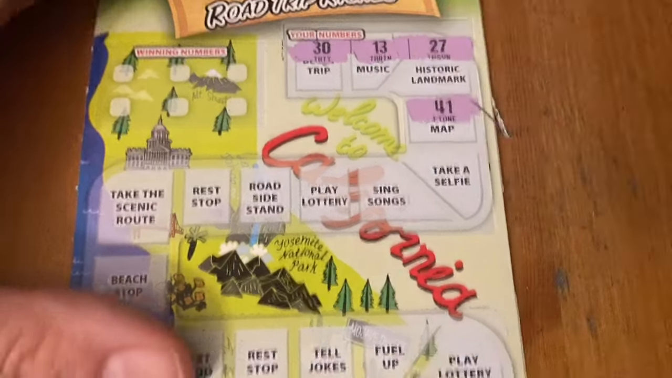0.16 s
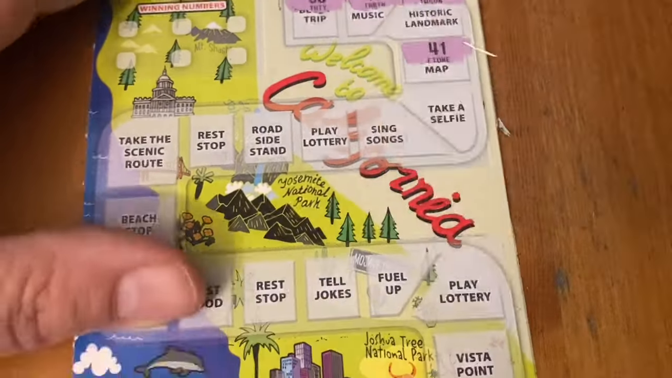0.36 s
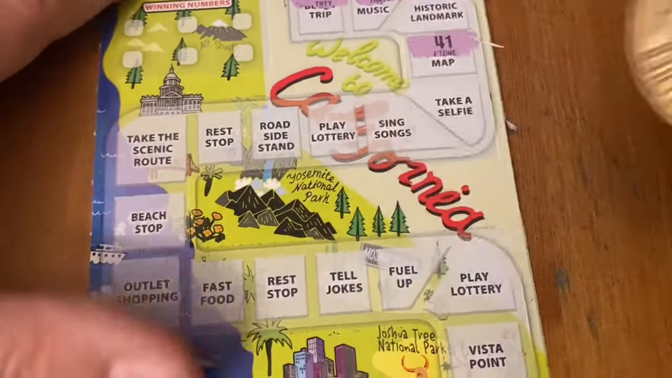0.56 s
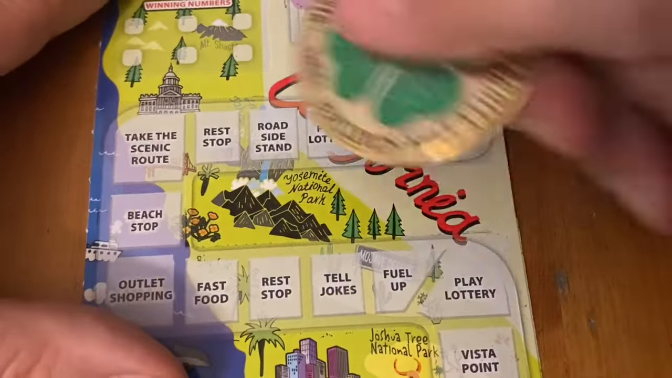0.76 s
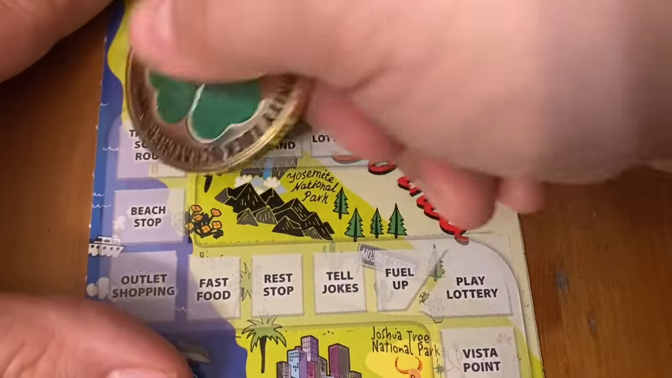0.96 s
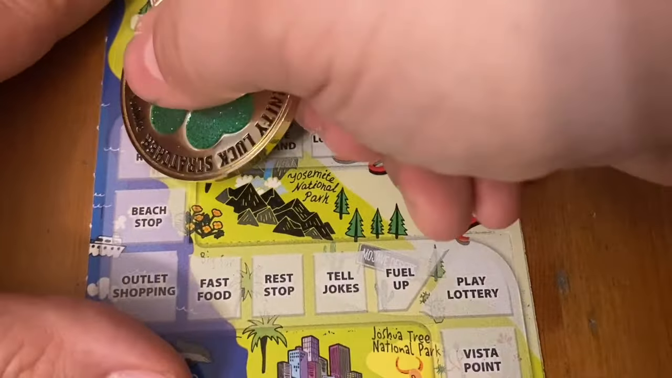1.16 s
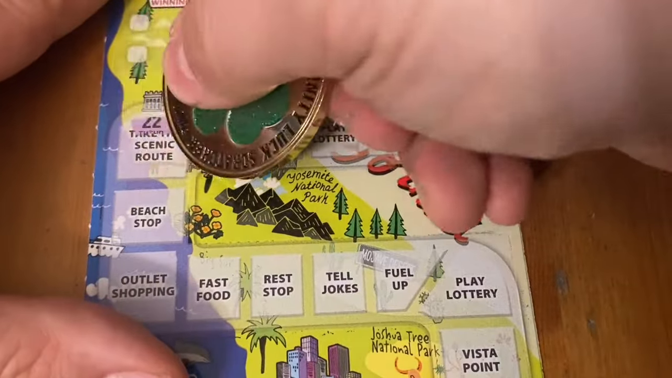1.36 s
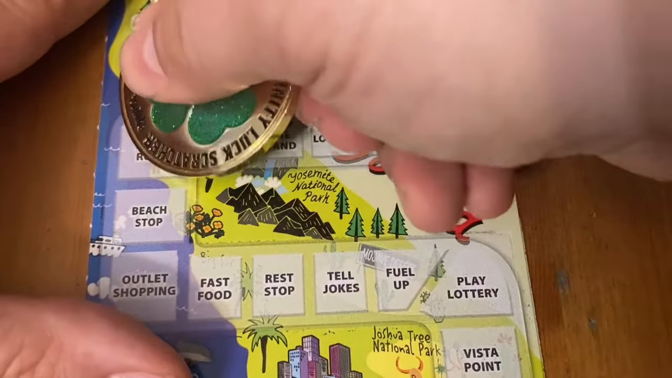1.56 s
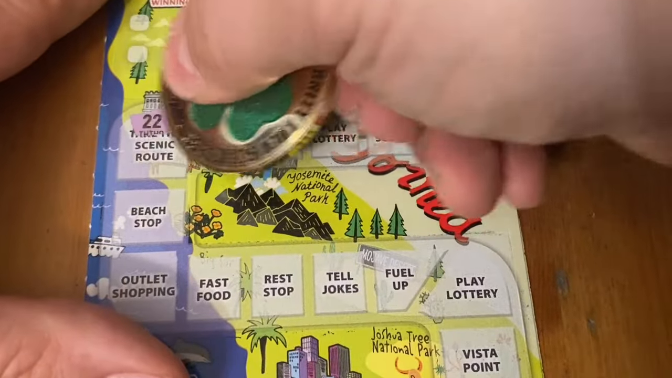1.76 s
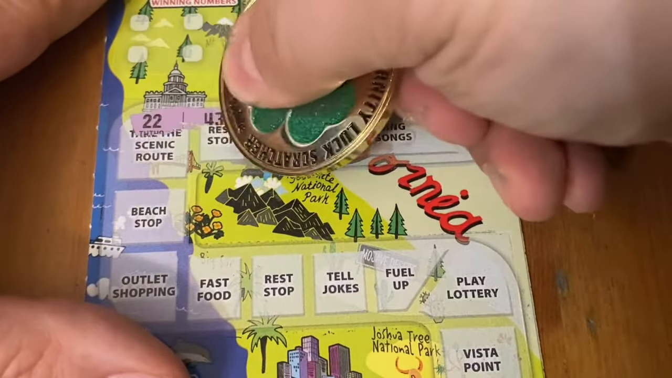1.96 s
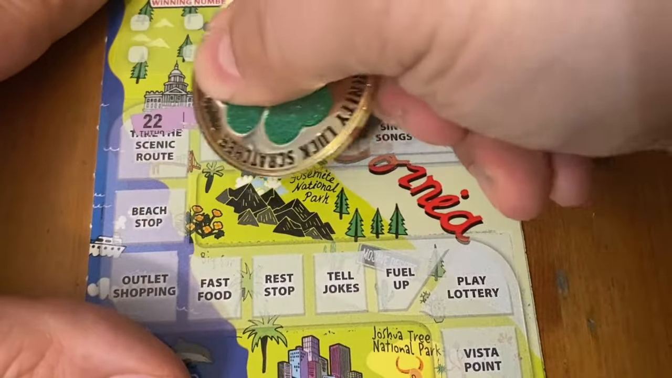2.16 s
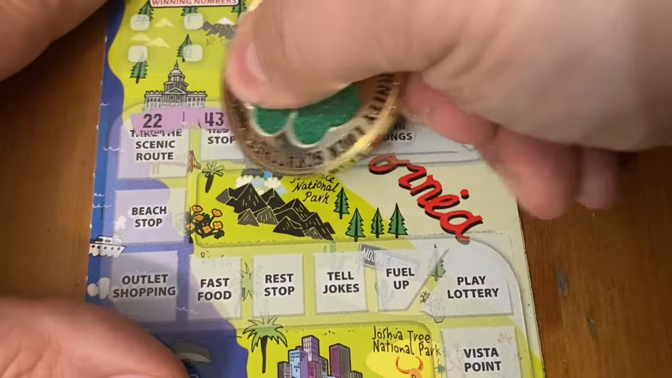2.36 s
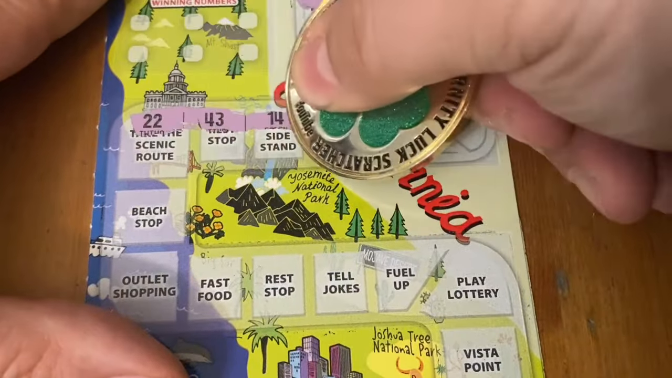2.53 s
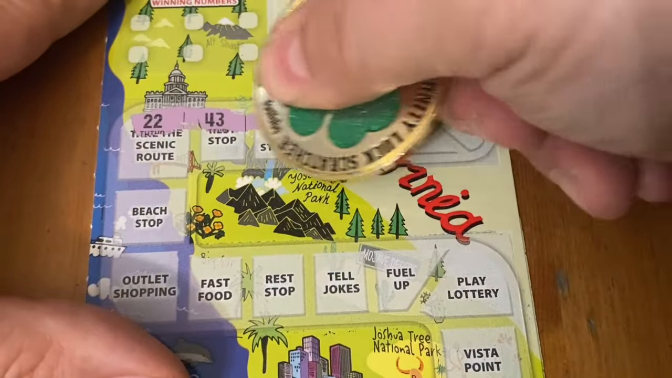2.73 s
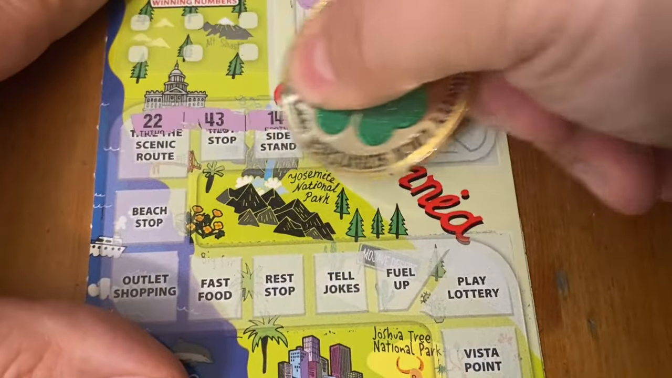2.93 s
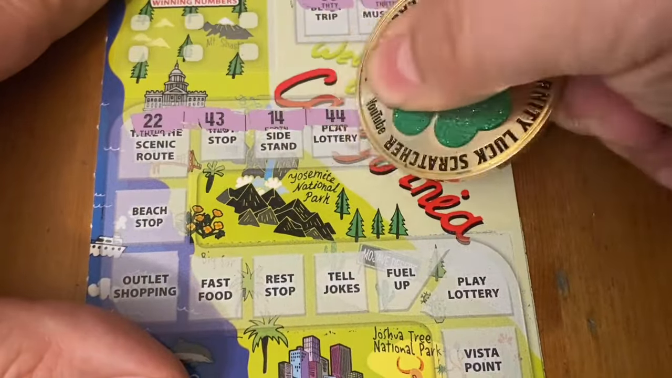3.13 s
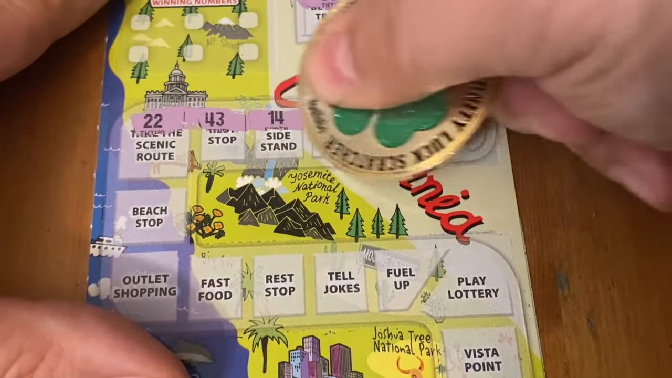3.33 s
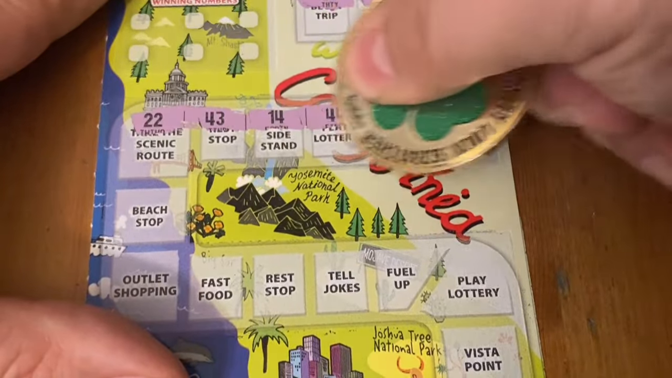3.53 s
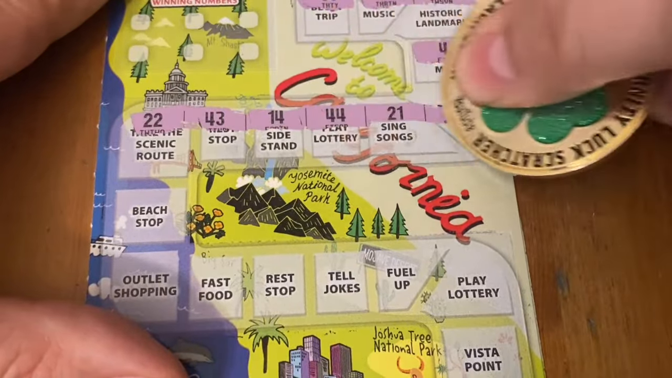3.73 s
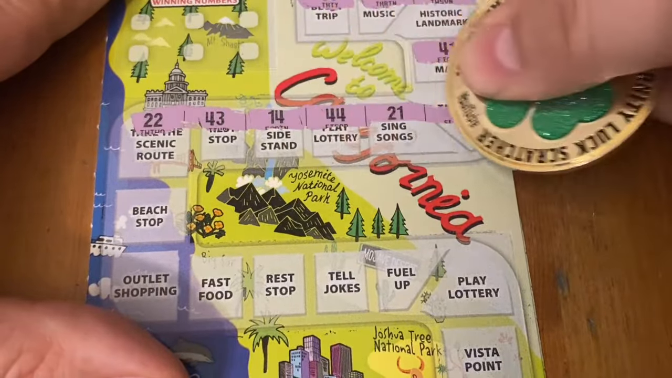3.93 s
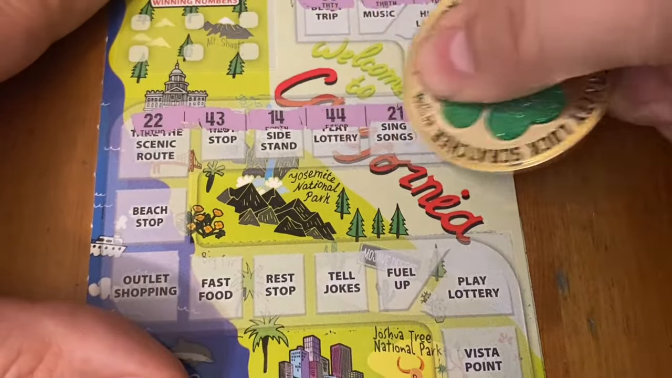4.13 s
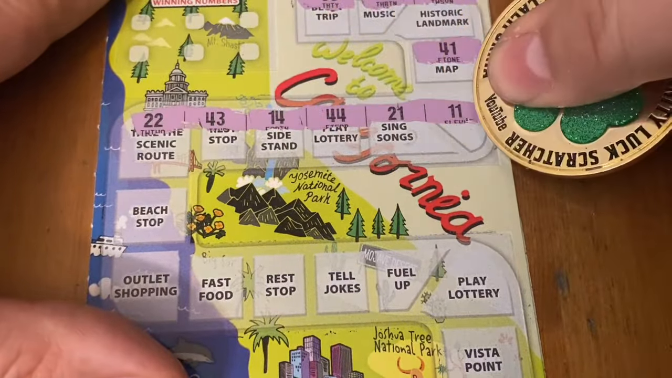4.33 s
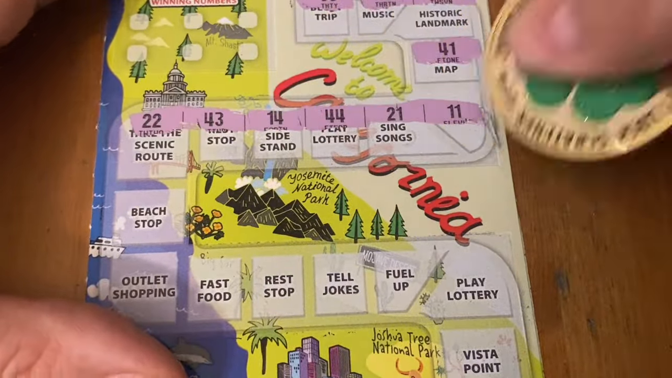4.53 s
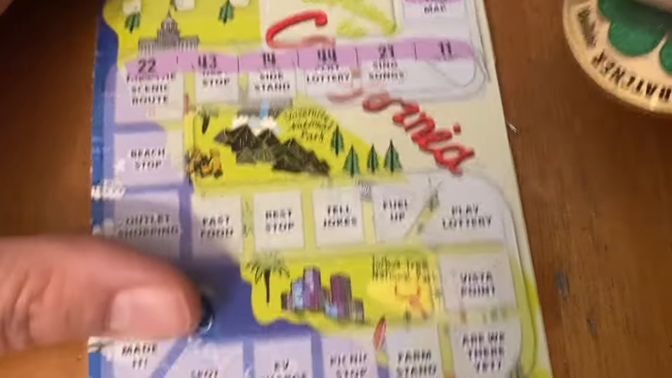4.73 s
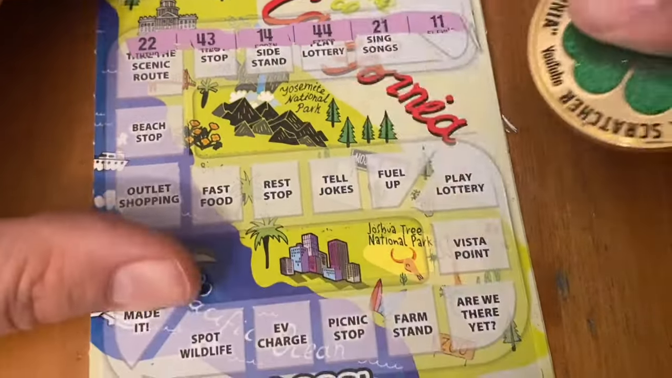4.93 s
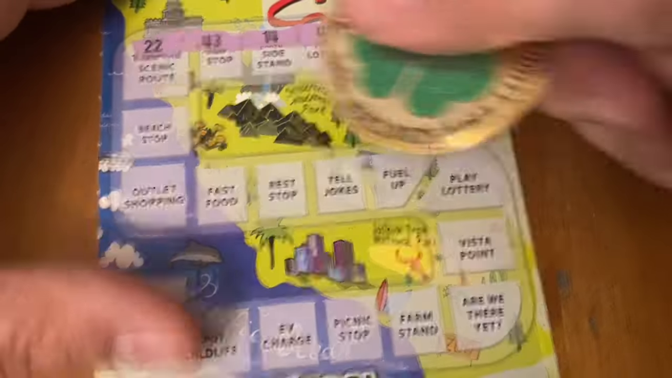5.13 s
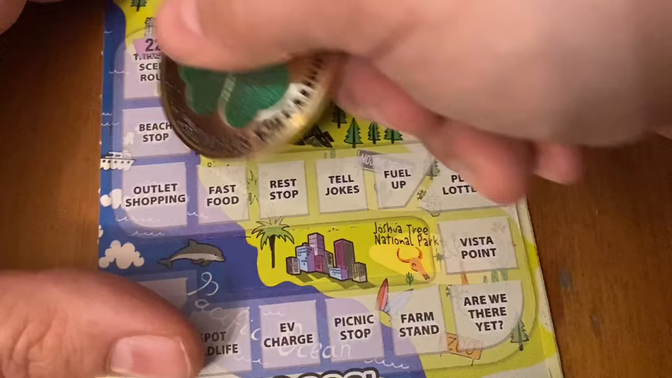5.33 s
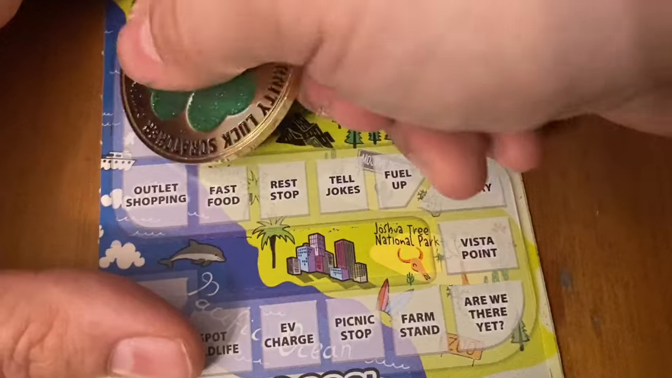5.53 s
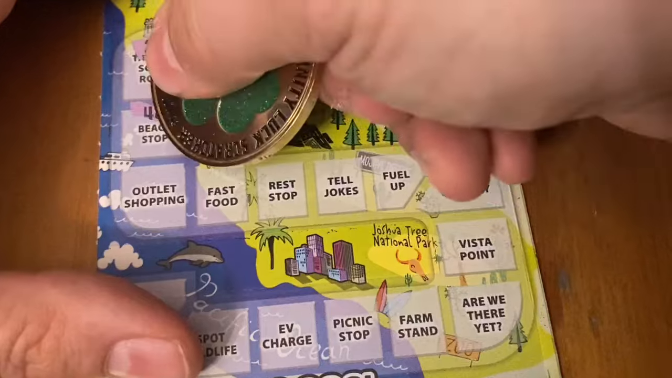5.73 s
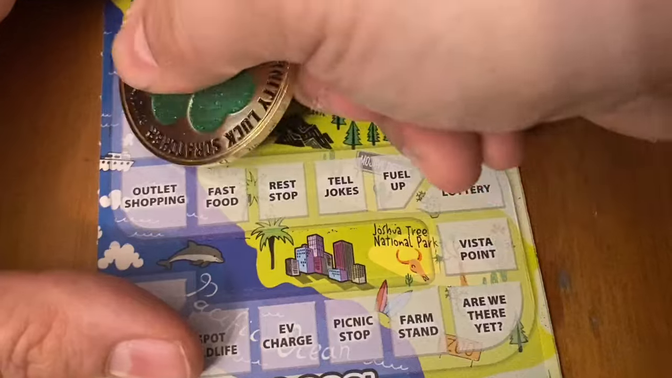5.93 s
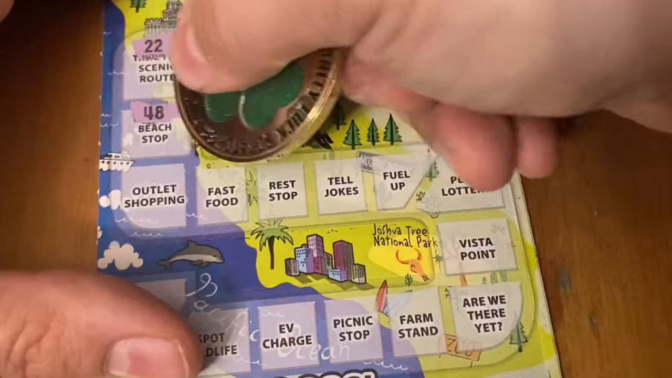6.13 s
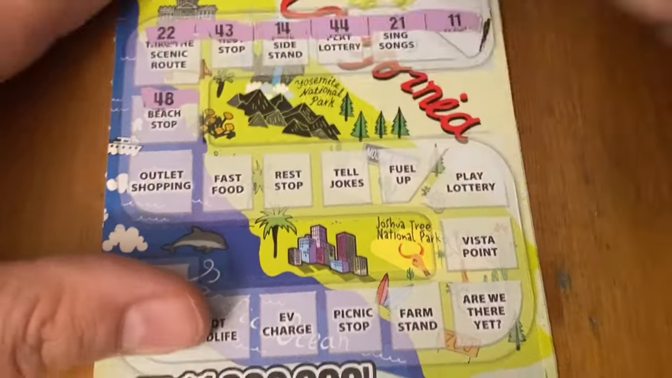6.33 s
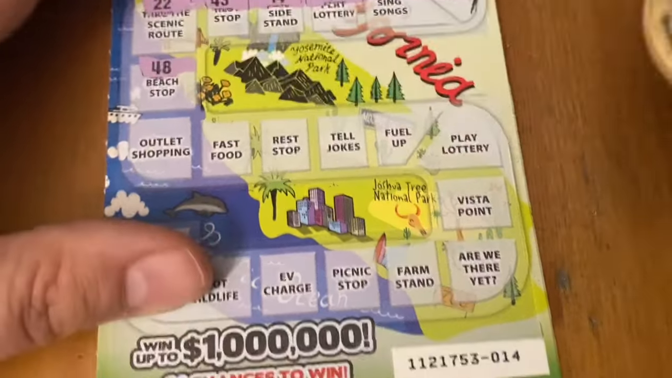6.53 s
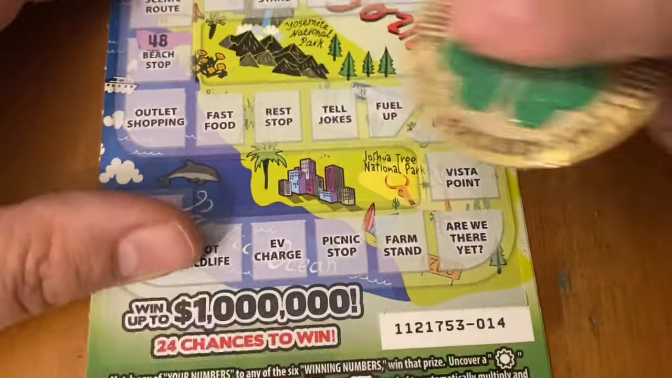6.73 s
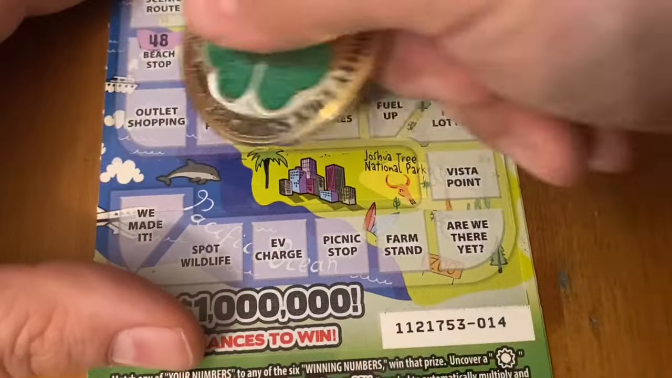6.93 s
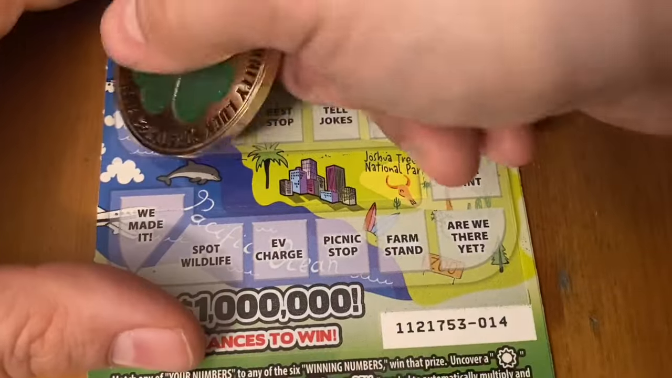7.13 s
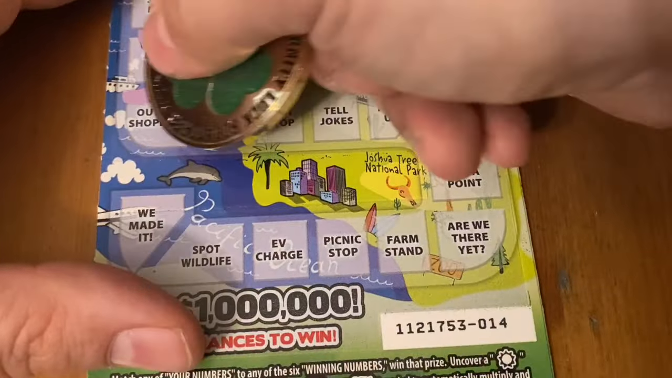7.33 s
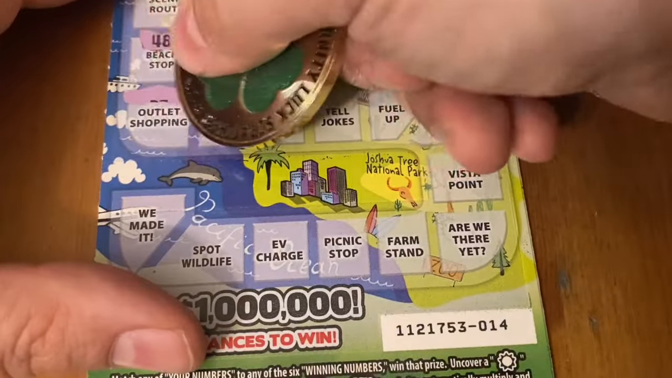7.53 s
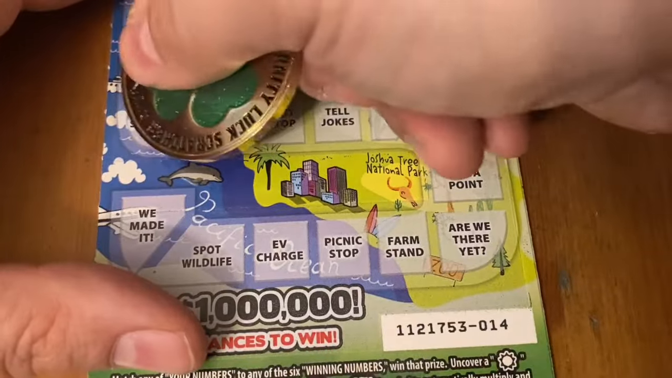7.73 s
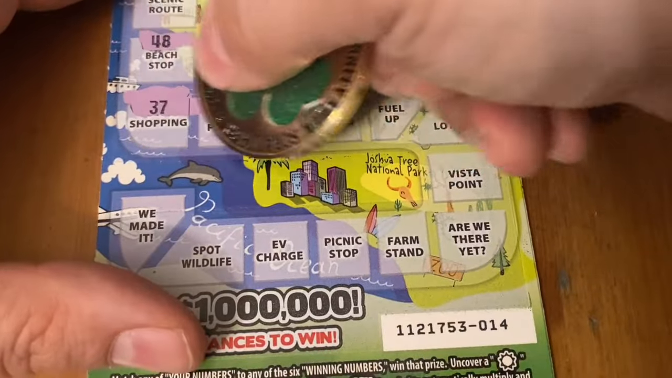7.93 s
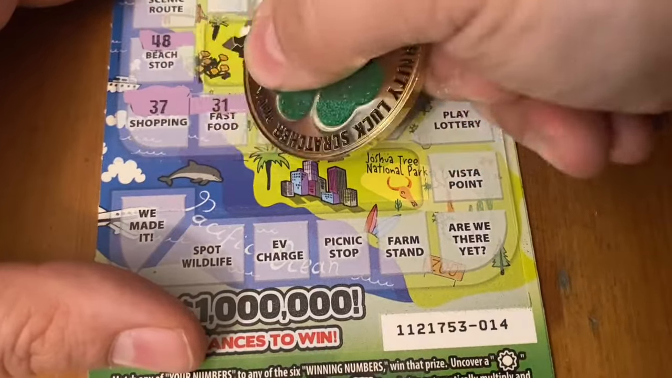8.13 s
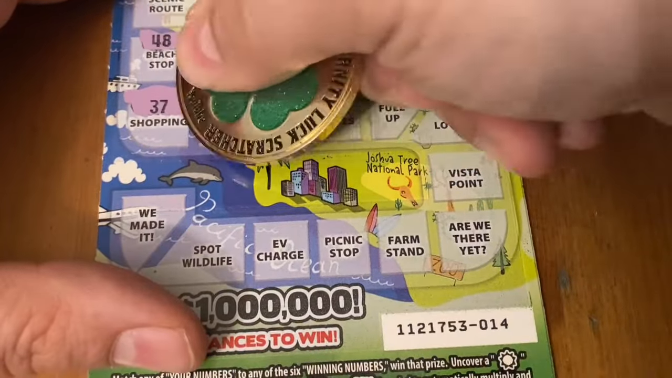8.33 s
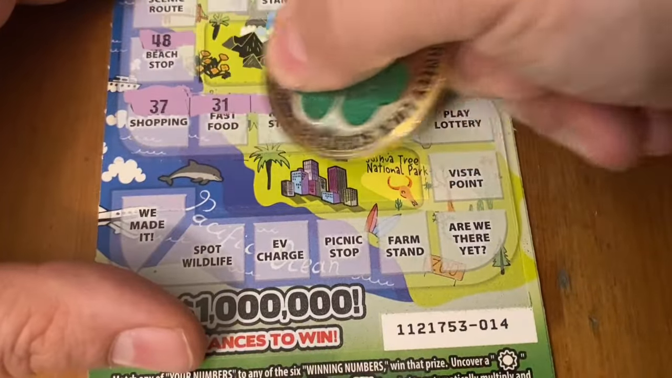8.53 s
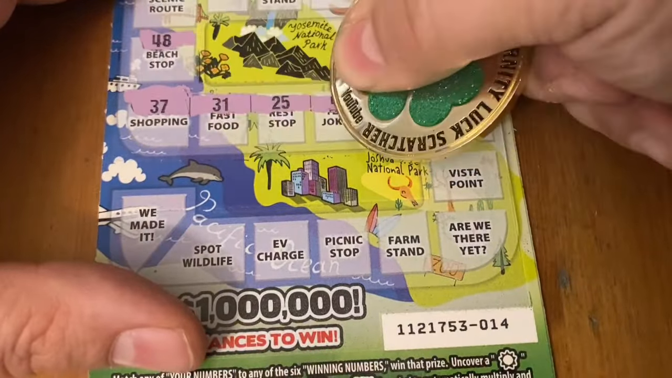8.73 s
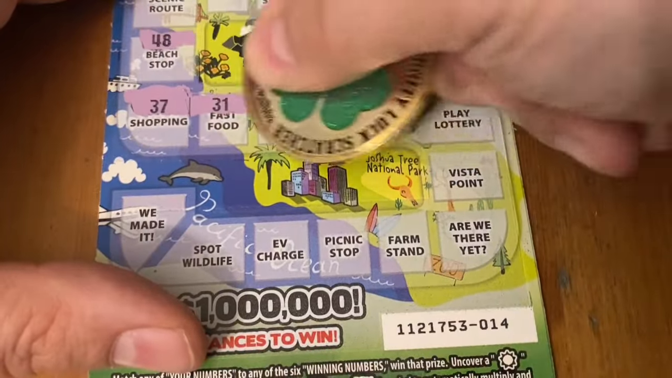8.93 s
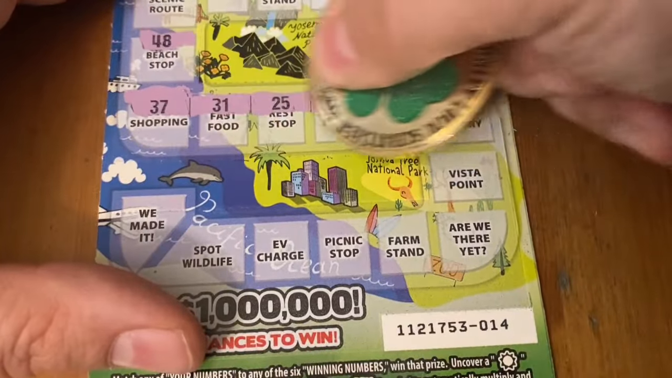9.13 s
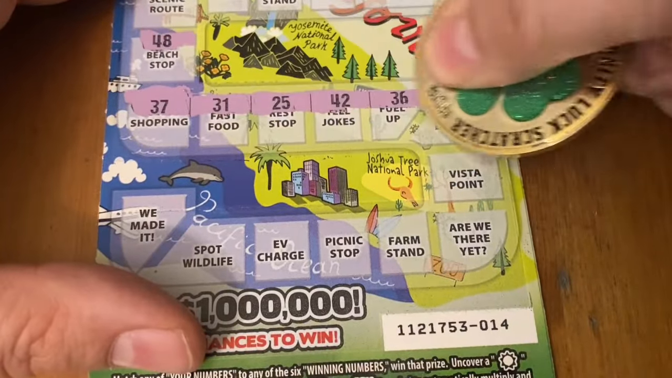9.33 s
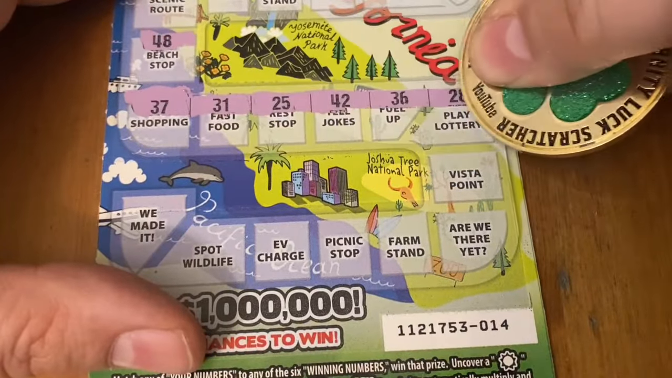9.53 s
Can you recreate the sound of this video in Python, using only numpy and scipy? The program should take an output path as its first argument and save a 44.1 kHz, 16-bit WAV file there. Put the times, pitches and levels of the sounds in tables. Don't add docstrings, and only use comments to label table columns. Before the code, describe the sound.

A quiet indoor room with faint air and low mains hum, heard very close in stereo. A bright card snap at 0.1 s leads into papery sliding, ticks and another snap near 0.5 s. The coin knocks onto the wooden table at 1.1 s, then scratches at 1.2, 1.7, 2.3 and 2.8 s, gritty and woody, with lighter return drags between. Strokes at 3.4 and 4.1 s snag and make the tabletop shudder in low buzzing bursts. From 4.5 to 5.3 s the card rustles and clicks as it shifts. A knock at 5.4 s precedes short scrapes until 6.2 s; more sliding and crisp ticks follow to 6.8 s. A firm knock at 7.1 s starts denser back-and-forth scraping at 7.2, 7.7 and 8.4 s, with a final longer, rough stroke from 9.0 to 9.5 s over a low judder.

```python
import sys
import numpy as np
from scipy import signal
from scipy.fft import rfft, irfft, next_fast_len
from scipy.io import wavfile
from scipy.ndimage import uniform_filter1d

SR = 44100
rng = np.random.default_rng(int(sys.argv[2]) if len(sys.argv) > 2 else 0)


def convert_level_to_amplitude(level_db):
    exponent = np.asarray(level_db, float) / 20
    return 10 ** exponent


def int16_out(signal):
    q = np.round(np.clip(np.atleast_2d(signal).T, -1, 1) * 32767)
    wavfile.write(sys.argv[1], SR, q.astype(np.int16))


N = 422037

# start in seconds, length in seconds,
# fastest at share [0-1], force in dB, hiss in dB.
CUTS = [(1.178, 0.18, 0.46, -43.5, -58.5), (1.663, .3, 0.38, -41.5, -51), (2.282, 0.097, 0.2, -56, -76),
        (2.337, 0.22, 0.18, -39, -49), (2.846, 0.27, 0.63, -41.5, -51), (3.433, .37, 0.49, -43.5, -51),
        (4.116, 0.19, 0.45, -45, -53.5), (5.564, 0.15, 0.29, -44.5, -58.5), (6.009, 0.14, 0.53, -42, -53.5),
        (7.215, 0.22, 0.62, -40.5, -56), (7.748, 0.35, 0.4, -40, -53), (8.384, 0.31, 0.6, -40.5, -47.5),
        (9.01, 0.52, 0.23, -41.5, -49.5)]
RETURNS = [
    (1.435, 0.14, 0.32, -50.5, -72),
    (2.084, 0.11, 0.4, -47.5, -63.5),
    (2.653, 0.15, 0.14, -47, -68),
    (3.223, 0.13, 0.7, -49, -60),
    (3.928, 0.14, 0.64, -49.5, -60.5),
    (5.827, 0.095, 0.35, -47, -64),
    (7.543, 0.15, 0.2, -45.5, -61),
    (8.195, 0.16, 0.58, -51, -60),
    (8.788, 0.17, 0.86, -47.5, -58),
]
ANSWER = {"top": (-1, 5, 0.4, 0.2836, 0.28), "mid": (-0.5, -12, 0.66, -0.08, 0.29),
          "upper": (2.5, -7, 0.98, 0.45, 0.19), "rub": (0.1, 0.41, 1, 0.85, 0.075),
          "boards": (-4, -1, 0.48, 0.36, 0.2)}
# time in seconds, extra force in dB.
SNAGS = [(1.19, 9), (1.215, 5.5), (1.452, 8.5), (1.68, 3.5), (2.092, -1), (2.29, 7.5), (2.467, 0.5),
         (2.852, 5), (2.96, 7), (3.055, -3), (3.228, 10), (3.279, 7), (3.438, 5.5), (3.519, 3.5),
         (3.578, 7), (4.009, -4), (4.172, 0.5), (4.246, 2), (5.569, 2.5), (5.601, -2.5), (5.839, 2.5),
         (6.023, 2), (6.08, 3), (7.233, 2.5), (7.342, -7), (7.409, 5), (7.553, 0.5), (7.571, -1), (7.75, 2),
         (7.851, 1), (8.202, 9), (8.293, 3), (8.404, 3.5), (8.514, 3.5), (8.8, 10), (8.911, -2), (9.033, 3),
         (9.182, 3), (9.288, -0.5)]
SNAG_DIES_S, KICK_DB = 0.03, 25
# pitch in Hz, width in Hz, level in dB.
TOP = [(406, 150, -18.5), (563.5, 35, -9), (709, 33.3, -2), (769, 62, -5), (830, 63.5, -8)]
MID_TOP = [(1029.5, 55, -4), (1102, 36, -5.5), (1150, 61, -6), (1250, 146, -10)]
UPPER_TOP = [(1564, 49, 4.5), (1704, 52, 3.5), (1776, 49, 7), (2070, 79, -10), (2212, 36, -6.5),
             (2469, 71, -2), (2600, 35, -3.5), (2714, 107, -4), (3500, 290, -14.5)]
# pitch in Hz, width in Hz, level in dB.
RUB = [(3220, 970, -5), (3620, 68, -10), (4270, 420, -11), (4524, 140, 5.5), (4860, 210, 2.5),
       (5300, 510, -2.5), (5670, 280, -1.5), (6310, 110, 2)]
SHEEN = [(7370, 1400, 0), (7614, 270, 3), (8200, 83, -1.5), (10100, 1010, 3.5), (10360, 480, 7.5),
         (11300, 3900, -6.5), (11940, 460, -2), (16700, 1700, -4.5)]
# time in seconds, peak in dB,
# centre in Hz.
TICKS = [(1.209, -37, 4000), (2.3, -50, 10000), (2.34, -50, 11000), (2.357, -30, 10400),
         (2.662, -60, 7000), (3.3, -57, 6000), (2.963, -38, 6100), (3.2804, -44, 4550),
         (3.5772, -32, 7800), (4.1604, -37, 5300), (5.8575, -44, 7500), (7.399, -37, 3170),
         (7.32, -40, 4300), (7.5472, -51, 6150), (8.4726, -42, 5710), (7.3, -37, 6500),
         (9.1805, -38, 8900), (5.2639, -46, 7550), (5.76, -56, 5000), (6.797, -49, 14300),
         (8.335, -53, 1300), (2, -44, 9000), (0.26, -27, 8400), (5.444, -32, 12500), (7.1, -38, 11000),
         (4.793, -45, 5000), (0.26, -35, 2000), (5.86, -50, 14000)]
# time in seconds, peak in dB, pitch in Hz.
DIGS = [(2.374, -29.5, 986), (2.467, -31.5, 1190), (2.96, -44, 1060), (3.055, -29, 1046), (3.246, -37, 750),
        (3.279, -39, 716), (3.579, -23.5, 746), (4.009, -37, 686), (5.601, -32, 1179), (6.08, -35, 1070),
        (7.235, -36, 707), (7.341, -33, 1040), (7.41, -33, 1045), (7.572, -29.5, 724), (7.852, -30, 1160),
        (8.293, -42, 700), (8.515, -44, 1050), (8.8, -38, 777), (8.89, -35, 706), (8.911, -30, 772),
        (9.033, -32, 786), (9.183, -28, 710), (9.288, -35, 1080)]
DIG_DB, DIG_RISE_S, DIG_DIES_S = -5, 0.0016, 0.0049
# start in seconds, length in seconds, level in dB, from Hz, to Hz.
SWEEPS = [
    (8.2, .14, -54, 600, 850),
    (8.8, .14, -53, 620, 900),
    (2.09, .1, -57, 600, 800),
    (3.23, .12, -55, 600, 820),
]
FAVOURED = [(.16, .08, -60, 7400, 7300), (.3085, .006, -45, 5000, 4800), (.27, 0.089, -61, 7400, 7400),
            (4.566, 0.009, -41.5, 4800, 4800), (4.67, .13, -56.5, 7400, 7100), (4.1, .13, -68, 4700, 4900),
            (4.16, .13, -60, 3500, 3600), (6.595, 0.045, -63, 7500, 7500), (6.575, 0.066, -62, 4750, 4800),
            (9.12, 0.2, -58, 7500, 7300), (5.262, 0.035, -67, 7300, 7300), (5.335, .065, -66, 6200, 6200),
            (7.375, 0.05, -60, 3400, 3500), (7.58, 0.085, -60, 6300, 6200), (7.27, .1, -62, 4700, 4900),
            (7.4, 0.025, -44, 1150, 1200), (7.9, 0.18, -43, 1080, 1250), (7.97, 0.123, -53, 1500, 1900),
            (7.6, .09, -55, 680, 700), (8.83, 0.118, -46.5, 820, 800), (3.6, 0.174, -44.5, 800, 720),
            (3.68, 0.121, -51, 1300, 1250), (1.8, 0.17, -49.5, 1200, 1250), (8.55, 0.143, -53, 1100, 1230),
            (9.18, 0.069, -47, 750, 1000), (9.3, .16, -45, 1100, 1200), (1.24, 0.096, -58, 1500, 1600)]
HUMS = [
    (0, .3, -60.5, 1433, 1416),
    (.9, 1.0, -63, 2455, 2460),
]
HUM_WIDTH, FAVOURED_WIDTH = 0.029, 0.064
# start in seconds, length in seconds, strongest at share [0-1], level in dB.
JUDDERS = [(1.154, 0.25, 0.55, -46), (1.66, 0.36, 0.43, -43), (2.318, 0.31, 0.12, -40),
           (2.64, 0.23, 0.2, -49), (2.89, 0.34, 0.23, -39), (3.21, 0.18, 0.33, -44.5),
           (3.498, 0.12, 0.7, -27.5), (3.578, 0.22, 0.02, -33.5), (3.935, 0.14, 0.79, -39),
           (4.13, 0.12, 0.43, -27.5), (4.21, 0.094, 0.36, -25.5), (4.465, 0.16, 0.25, -46),
           (5.105, 0.14, 0.34, -46), (5.392, 0.1, 0.7, -48), (5.583, .16, .6, -49),
           (5.807, 0.13, 0.47, -45), (6.006, 0.172, 0.83, -41), (7.068, 0.16, 0.46, -50),
           (7.276, 0.47, 0.11, -50), (7.754, 0.46, 0.43, -45.5), (8.198, 0.082, 0.05, -41.5),
           (8.39, 0.3, 0.5, -38.5), (9.028, 0.13, 0.63, -39), (9.15, 0.33, 0.16, -31.5)]
JUDDER_GROWTH = 1.35
JUDDER_LOOSE = 0.51
JUDDER_SWAY_DB, JUDDER_DRUM_DB = -10, -15.5
# time in seconds, rate in Hz.
JUDDER_HZ = [(1.1, 82.6), (1.52, 89.7), (2.11, 74.6), (2.63, 94.1), (2.89, 82), (3.03, 101.7), (3.1, 85.8),
             (4.26, 81.4), (5.18, 102), (5.32, 79.8), (6.71, 73.8), (6.95, 94.6), (7.07, 73.3),
             (8.04, 91.2), (8.53, 78.4), (9.1, 100.9), (9.19, 77.56), (9.57, 82.8)]
# time in seconds, level in dB.
LEAN = [(0.0, -47.5), (0.4, -49), (0.95, -56), (1.41, -54.5), (1.5, -44.5), (2.1, -54.5), (2.4, -57.5),
        (3.499, -49.5), (4.3, -48), (4.43, -70), (4.58, -49.5), (5.76, -52.5), (6.79, -53.5), (6.98, -82),
        (7.22, -54.5), (8.85, -45), (9.2, -47.5), (9.57, -41.5)]
LEAN_JUDDER_DB, LEAN_BOARDS_DB, LEAN_FOLLOWS = -60, -60, 0.2
# pitch in Hz, width in Hz, level in dB.
BOARDS = [(120, 73, -25.5), (198.3, 33.4, 4.5), (325.7, 27.6, 0.5), (406, 91, -6.5)]
# time in seconds, peak in dB, hardness in dB per octave.
KNOCKS = [(0.284, -44.5, -1.5), (0.309, -44.5, -1), (1.0719, -28, 1.5), (1.112, -43.5, -4),
          (2.371, -39.5, 6.5), (2.768, -41.5, 1), (3.244, -54, 7.5), (3.306, -45, -6), (4.006, -45, -5),
          (4.491, -49.5, -8), (4.679, -52, -3.5), (4.974, -55.5, -1), (5.137, -40, -3), (5.178, -64, -7),
          (5.447, -32.5, 0.5), (5.488, -47, -7), (6.24, -47, -3), (7.137, -24.5, 3), (7.172, -41, -4),
          (7.408, -45, 2), (7.565, -51.5, 9), (8.198, -61, 11), (8.733, -42, -0.5), (9.181, -40.5, 1),
          (7.85, -44, 0), (8.292, -52, 9), (8.334, -68, 13), (8.91, -55, 5), (3.577, -40, 3.5),
          (3.228, -58, 0)]
# pitch in Hz, width in Hz, level in dB.
THUD = [(122, 23, -10), (195, 36.6, 1.5), (246, 59, -10), (335, 25.3, -6), (430, 27, -14.5),
        (570, 56, -9.5), (725, 55, -5.5), (1024, 63, -16.5), (1153, 35, -23), (1347, 89, -30),
        (1540, 130, -34), (1800, 220, -42), (2500, 210, -37)]
# start in seconds, length in
# seconds, fastest at share [0-1], rustle in dB, dull rub in dB.
SLIDES = [(-.1, 0.22, 0.16, -58, -53.5), (0.069, 0.18, 0.82, -60, -56.5), (0.256, 0.11, 0.22, -56, -61),
          (0.4, 0.1, 0.2, -68, -73), (0.488, 0.024, 0.74, -55.5, -77), (0.52, 1.61, 0.72, -60.5, -61),
          (2.5, 0.55, 0.45, -81, -58), (3.77, 0.32, 1, -74.5, -63), (4.46, 0.27, 0.74, -61, -68.5),
          (4.617, 0.18, 1, -54.5, -70), (4.79, 0.28, 0.78, -74, -65), (5.075, 0.18, 0.37, -72.5, -65),
          (5.229, .29, 0.44, -63.5, -59.5), (5.69, 0.5, 0.31, -77, -63), (6.154, 0.22, 0.34, -62.5, -66),
          (6.373, 0.16, 0.53, -59, -68.5), (6.53, 0.046, 0.5, -64.5, -71), (6.555, 0.088, 0.7, -58.5, -71),
          (6.797, 0.034, 0.15, -65.5, -66.5), (6.995, 0.26, 0.67, -69, -61), (8.66, 0.15, 0.3, -90, -65),
          (8.936, 0.07, 0.1, -78, -64), (9.418, 0.14, 0.2, -89, -74)]
RUSTLE_GROWTH, DULL_GROWTH = 0.82, 0.58
# pitch in Hz, width in Hz, level in dB.
RUSTLE = [(2640, 530, -2), (4170, 700, 2.5), (4910, 830, 4), (6350, 1200, 0), (7410, 1980, 5.5),
          (7900, 4100, 0.5)]
RUSTLE_TOP = [(9420, 760, -0.03), (11000, 2600, -0.9), (12400, 3100, -0.79), (14400, 1500, -0.9),
              (15200, 600, -1.8)]
DULL = [(1430, 390, 4.5), (1820, 280, 6), (2440, 650, -2.5)]
LINGER_S, LINGER_DB = 0.027, -16
# time in seconds, peak in dB, centre in Hz.
SNAPS = [(0.1218, -12.5, 4440), (0.408, -52, 11000), (0.3105, -27.5, 4860), (0.417, -46, 9000),
         (0.493, -50.5, 5130), (0.5077, -25, 3360), (0.59, -38, 11500), (0.9076, -50, 2440),
         (1.071, -42, 2500), (2.356, -44.5, 2660), (3.5753, -53, 2610), (4.5032, -45.5, 3620),
         (4.5501, -61, 5630), (4.57, -30, 4730), (4.635, -34, 4200), (4.6577, -35, 7020),
         (4.905, -44, 4930), (4.9534, -50, 2640), (4.9745, -34.5, 10500), (5.128, -31.5, 11300),
         (5.157, -57, 1930), (5.177, -64, 2500), (5.444, -35.5, 5950), (6.227, -33, 7900),
         (6.413, -56, 5180), (6.5121, -32, 6970), (8.336, -42, 1900), (6.8024, -36, 14170),
         (7.138, -44, 2310), (7.674, -31.5, 10080), (0.396, -55, 5000), (0.479, -50.5, 5200),
         (4.835, -51, 8950), (4.96, -56, 9000), (5.181, -45, 11000), (6.108, -38, 9000), (6.244, -37, 6830),
         (6.659, -46, 11000), (6.888, -57, 10000), (6.8035, -41.5, 4200), (0.508, -34, 2600),
         (6.5125, -30.5, 3000), (5.428, -52, 11000), (5.135, -46, 3500), (4.672, -46.5, 1700)]
# pitch in Hz, level in dB per Hz.
ROOM = [(18, -38), (30, 19), (59, -2), (106, -8), (270, -16.5), (544, -8.5), (910, -18), (1560, -22),
        (3140, -46), (4460, -41.5), (8000, -89), (10400, -90), (17600, -120)]
ROOM_DB, HUM_HZ, HUM_DB = -53.5, 119.3, -57.5
# pitch in Hz, left minus right in dB.
LEFT_LOUDER = [(60, 0.5), (110, -1), (200, 1), (380, 3), (700, 5.5), (1290, 0), (2380, 1.5), (4400, 3),
               (8120, 2.5), (15000, -1)]
# pitch in Hz, lead in radians.
LEFT_AHEAD = [(100, 0.23), (400, 0.84), (900, 0.87), (1800, 1.44), (2500, 0.55), (4000, 0.91),
              (6000, 0.0051)]
PORT_FROM_HZ, PORT_TURN_HZ = 6950, 4200


def scraping():
    rub = stroke_gain("rub")
    catch = convert_level_to_amplitude(0.96 * drift(14.2) + 0.5 * drift(60)) * snags()
    force = grit(4000, 2.45, unlike=0.36) * catch + kicks()
    fine = catch * convert_level_to_amplitude(2.3 * drift(170))
    layers = [(force, TOP, stroke_gain("top"), 0.9),
              (force, MID_TOP, stroke_gain("mid"), 1.1),
              (force, UPPER_TOP, stroke_gain("upper"), 2.2),
              (fine * grit(12000, 1.0, unlike=0.32), RUB, convert_level_to_amplitude(-5.0) * rub, 3.0),
              (fine * grit(11000, 1.0, unlike=0.33), SHEEN, convert_level_to_amplitude(-3.0) * rub, 1.0)]
    return sum(gain * rms_one(body(f, modes, wander_db=w)) for f, modes, gain, w in layers)


def stroke_gain(modes):
    cut_db, return_db, growth, share, later = ANSWER[modes]
    rows = np.array(CUTS + RETURNS)
    offset_db = np.repeat([cut_db, return_db], [len(CUTS), len(RETURNS)])
    level_db = offset_db + (1 - share) * rows[:, 3] + share * rows[:, 4]
    return movements(rows + [0, 0, later, 0, 0], level_db, growth)


def movements(rows, level_db, growth):
    t, power = np.arange(0, N + 40, 40) / SR, 0
    for (s, length, top, *_), db in zip(rows, level_db):
        peak_s = s + np.clip(top, 0.05, 0.95) * length
        speed = np.interp(t, [s, peak_s, s + length], [0, 1, 0])
        power = power + convert_level_to_amplitude(2 * db) * speed ** (2 * max(growth, 0.1))
    fade = np.exp(-80 / (SR * LINGER_S))
    power = power + convert_level_to_amplitude(LINGER_DB) * signal.lfilter([1 - fade], [1, -fade], power)
    gain = np.sqrt(uniform_filter1d(power, size=5).clip(0))
    return np.interp(np.arange(N) / SR, t, gain)


def snags():
    s, db = np.transpose(SNAGS)
    jump = np.zeros(N)
    jump[(s * SR).astype(int)] = db
    fade = np.exp(-1 / (SR * SNAG_DIES_S))
    return convert_level_to_amplitude(signal.lfilter([1], [1, -fade], jump + 1e-18))


def kicks():
    s, db = np.transpose(SNAGS)
    push = np.zeros(N)
    push[(s * SR).astype(int)] = convert_level_to_amplitude(KICK_DB + db)
    return push


def grit(per_s, spread_db, unlike):
    sizes = convert_level_to_amplitude(spread_db * np.minimum(rng.exponential(1, N), 5)) * rng.choice([-1, 1], N)
    slips = rms_one(sizes * (rng.random(N) < per_s / SR))
    return slips + unlike * rng.standard_normal((2, N))


def body(force, modes, wander_db=0):
    return sum((-1) ** k * convert_level_to_amplitude(db) * resonate(force * convert_level_to_amplitude(wander_db * drift(10.8)), hz, width)
               for k, (hz, width, db) in enumerate(modes))


def resonate(x, hz, width):
    r = np.exp(-np.pi * width / SR)
    poles = [1, -2 * r * np.cos(2 * np.pi * hz / SR), r * r]
    return signal.lfilter([(1 - r * r) / 2, 0, (r * r - 1) / 2], poles, x)


def drift(rate):
    r = np.exp(-80 * np.pi * rate / SR)
    slow = signal.lfilter([1], [1, -2 * r, r * r], rng.standard_normal(N // 40 + 2002))[2000:]
    return np.interp(np.arange(N) / 40, np.arange(len(slow)), rms_one(slow))


def rms_one(x):
    return x / np.sqrt(np.mean(x ** 2) + 1e-20)


def digs():
    out, t = np.zeros(N), np.arange(2000) / SR
    shape = (1 - np.exp(-t / DIG_RISE_S)) * np.exp(-t / DIG_DIES_S)
    shape = shape / shape.max()
    for s, peak_db, hz in DIGS:
        i = round(s * SR)
        ring = np.sin(2 * np.pi * hz * t) + 0.23 * np.sin(2 * np.pi * 1.45 * hz * t)
        out[i:i + 2000] += convert_level_to_amplitude(peak_db + DIG_DB) * shape * ring
    return out


def glides(rows, width):
    out = np.zeros((2, N))
    noise = rng.standard_normal((len(rows), 4, SR + 300))
    for (s, length, db, from_hz, to_hz), (a, b, c, d) in zip(rows, noise):
        i, n = int(s * SR), int(min(length, 1) * SR)
        r = np.exp(-np.pi * width * from_hz / SR)
        rough = a + 1j * b + 0.26 * (c + 1j * d) * [[1], [-1]]
        swing = signal.lfilter([1], [1, -r], rough[:, :n + 300])[:, 300:]
        turn = np.exp(2j * np.pi * np.cumsum(np.linspace(from_hz, to_hz, n)) / SR)
        swell = np.sin(np.linspace(0, np.pi, n)) ** 0.37
        out[:, i:i + n] += convert_level_to_amplitude(db) * rms_one((swing * turn).real) * swell
    return out


def shaking():
    t = np.arange(N) / SR
    sway_db = np.interp(t, *np.transpose(LEAN))
    weight = convert_level_to_amplitude(LEAN_FOLLOWS * (sway_db - sway_db.mean()))
    loose = resonate(resonate(rng.standard_normal(N), 83.5, 37), 90.3, 26)
    rate_hz = np.interp(t, *np.transpose(JUDDER_HZ))
    judder = JUDDER_LOOSE * rms_one(evened(loose)) + np.sin(2 * np.pi * np.cumsum(rate_hz) / SR)
    sway = resonate(resonate(rng.standard_normal(N), 45.6, 60), 46.0, 21)
    boards = body(grit(3000, 2.97, unlike=0.51), BOARDS, wander_db=-0.5)
    drum = resonate(resonate(rng.standard_normal(N), 194, 48), 197, 66)
    dig = movements(JUDDERS, np.array(JUDDERS)[:, 3], JUDDER_GROWTH)
    out = (dig + convert_level_to_amplitude(LEAN_JUDDER_DB) * weight) * rms_one(judder)
    out = out + (convert_level_to_amplitude(sway_db + 0.85) + convert_level_to_amplitude(JUDDER_SWAY_DB) * dig) * rms_one(evened(sway))
    out = out + convert_level_to_amplitude(JUDDER_DRUM_DB) * dig * rms_one(drum)
    return out + (stroke_gain("boards") + convert_level_to_amplitude(LEAN_BOARDS_DB) * weight) * rms_one(boards)


def evened(swing):
    swell = np.sqrt(uniform_filter1d(swing ** 2, size=1500).clip(0))
    return swing / (swell + 0.8 * swing.std())


def knocks():
    s, peak_db, hard_db = np.transpose(KNOCKS)
    out = np.zeros((2, N))
    scatter_db = rng.uniform(-1.5, 1.5, (len(s), len(THUD)))
    noise = rng.standard_normal((2, N))
    for k, (hz, width, db) in enumerate(THUD):
        late_s = 0.061 / np.sqrt(hz) - 0.002
        at = ((s + late_s) * SR).round().astype(int)
        blow = np.full(N, 1e-18)
        blow[at] = convert_level_to_amplitude(peak_db + db + hard_db * np.log2(hz / 300) + scatter_db[:, k])
        fade = convert_level_to_amplitude(-60 / (SR * 0.22 * (300 / hz) ** 0.44))
        rumble = convert_level_to_amplitude(-33) * noise * signal.lfilter([1], [1, -fade], blow)
        ring = resonate(resonate((-1) ** k * blow + rumble, hz, width), hz, 4.9 * width)
        out += ring * SR / (3 * width)
    return out


def sliding():
    rows = np.array(SLIDES)
    rustle = movements(rows, rows[:, 3], RUSTLE_GROWTH)
    dull = movements(rows, rows[:, 4], DULL_GROWTH)
    catch = convert_level_to_amplitude(1.5 * drift(60))
    layers = [(grit(5000, 1.8, unlike=0.65), RUSTLE, convert_level_to_amplitude(1.0) * rustle),
              (grit(9000, 1.8, unlike=0.2), RUSTLE_TOP, convert_level_to_amplitude(0.4) * rustle),
              (grit(9000, 2.8, unlike=1.0), DULL, dull)]
    return sum(gain * rms_one(body(f * catch, modes, wander_db=1.65)) for f, modes, gain in layers)


def snaps(rows):
    out, t = np.zeros(N), np.arange(600) / SR
    splinter = 0.16 * t / 0.0002 * np.exp(-t / 0.0004) + 0.04 * np.exp(-t / 0.002)
    for (s, peak_db, hz), noise in zip(rows, rng.standard_normal((len(rows), 600))):
        burst = noise * splinter
        burst[4] += 1.5
        snap = resonate(resonate(burst, hz, 0.48 * hz), min(1.06 * hz, 16000), 1.5 * hz)
        snap = snap + 0.26 * min(hz / 4500, 1) ** 2 * resonate(burst, 7700, 12000)
        snap = snap + 0.34 * resonate(burst, 1500, 1800)
        i = round(s * SR)
        out[i:i + 600] += convert_level_to_amplitude(peak_db) * (snap / np.abs(snap).max())[:N - i]
    return out


def room():
    hz = np.maximum(np.fft.rfftfreq(N, 1 / SR), 1)
    shared, *own = rfft(rng.standard_normal((3, N)))
    alike = 1 / (1 + hz / 600)
    sides = np.sqrt(alike) * shared + np.sqrt(1 - alike) * np.array(own)
    noise = irfft(convert_level_to_amplitude(at_hz(ROOM, hz)) * sides, N)
    hum = resonate(resonate(rng.standard_normal(N), HUM_HZ, 4), HUM_HZ, 7.9)
    return convert_level_to_amplitude(ROOM_DB + 2.1 * drift(15)) * rms_one(noise) + convert_level_to_amplitude(HUM_DB) * rms_one(hum)


def at_hz(points, hz):
    table_hz, value = np.array(points).T
    return np.interp(np.log(hz), np.log(table_hz), value)


def scene():
    cracks = snaps(SNAPS)
    near = scraping() + sliding() + glides(HUMS, HUM_WIDTH) + glides(FAVOURED, FAVOURED_WIDTH)
    near = near + 1.01 * cracks + room()
    low = shaking() + knocks() + digs() + glides(SWEEPS, FAVOURED_WIDTH)
    band_top = signal.ellip(10, 0.5, 60, 15850, fs=SR, output="sos")
    return signal.sosfilt(band_top, near + snaps(TICKS)) + low + 0.12 * cracks


def band_limit(x):
    return signal.sosfilt(signal.butter(12, 16970, fs=SR, output="sos"), x)


def record(dry):
    size = next_fast_len(N + 512)
    hz = np.maximum(np.fft.rfftfreq(size, 1 / SR), 1)
    flips = 2 * np.maximum(hz - PORT_FROM_HZ, 0) / PORT_TURN_HZ
    flips = np.floor(flips) + np.clip(0.5 + 1.7 * (flips % 1 - 0.5), 0, 1)
    lead = at_hz(LEFT_AHEAD, hz) - np.pi * flips
    half = convert_level_to_amplitude(at_hz(LEFT_LOUDER, hz) / 2) * np.exp(0.5j * lead)
    bass_cut = 1 / np.sqrt(1 + (43 / hz) ** 10)
    ports = irfft(rfft(dry, size) * bass_cut * np.array([half, 1 / half]), size)[:, :N]
    return band_limit(ports)


dry = scene()
out = record(dry)
int16_out(out)
```